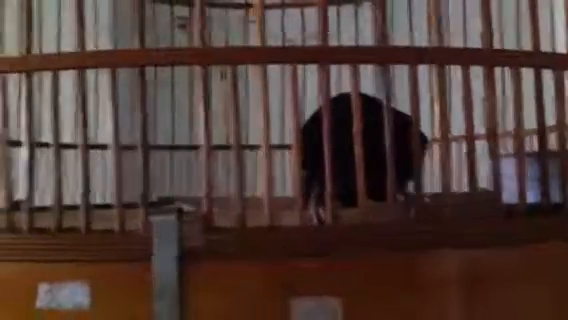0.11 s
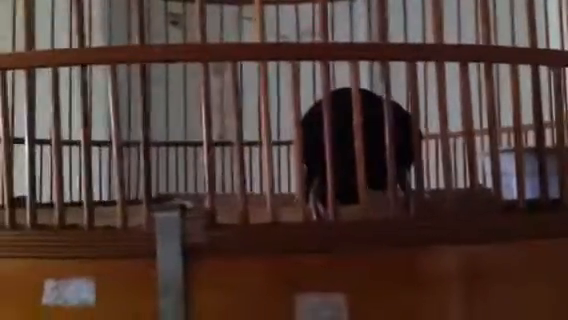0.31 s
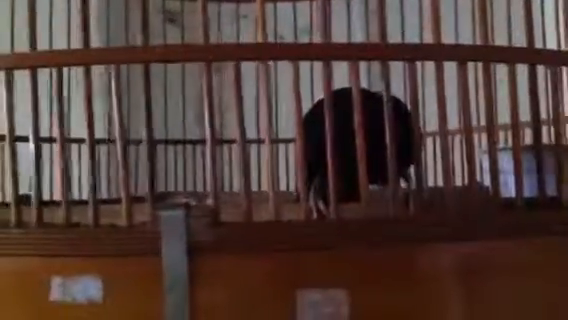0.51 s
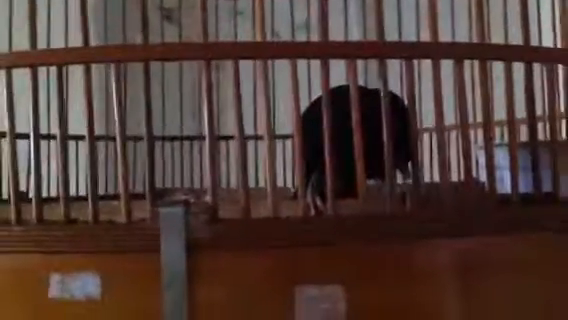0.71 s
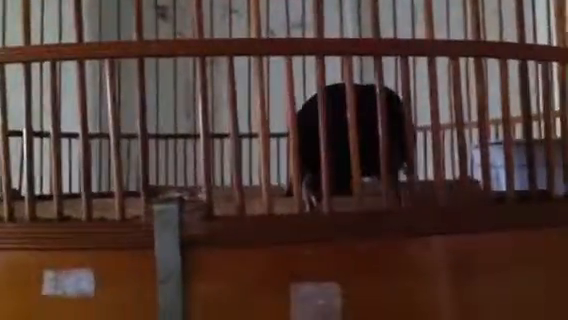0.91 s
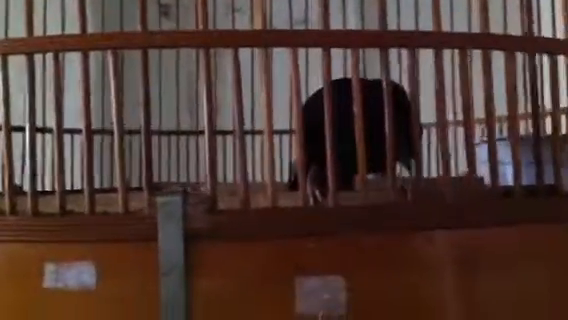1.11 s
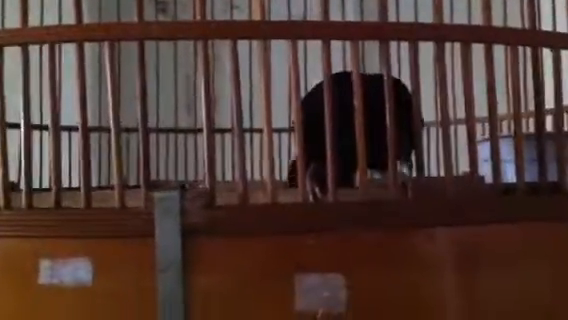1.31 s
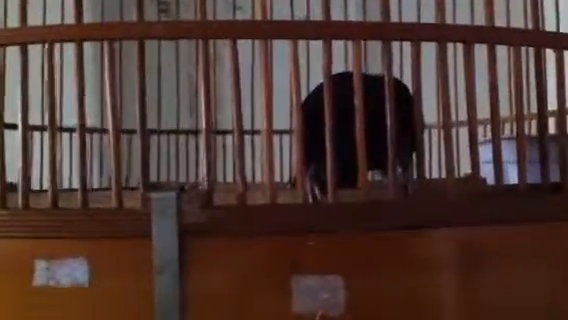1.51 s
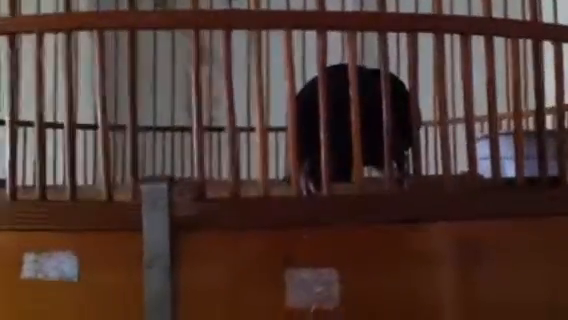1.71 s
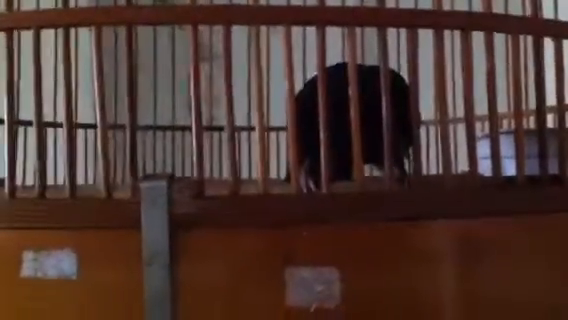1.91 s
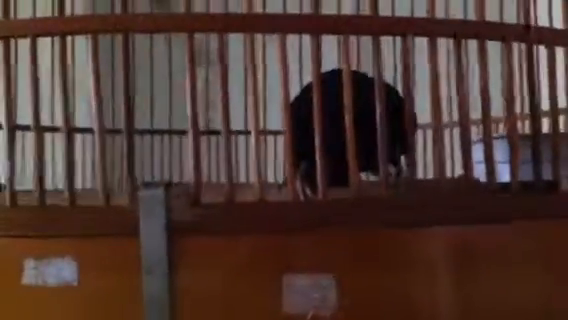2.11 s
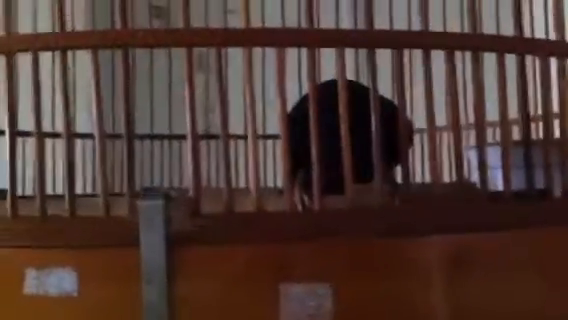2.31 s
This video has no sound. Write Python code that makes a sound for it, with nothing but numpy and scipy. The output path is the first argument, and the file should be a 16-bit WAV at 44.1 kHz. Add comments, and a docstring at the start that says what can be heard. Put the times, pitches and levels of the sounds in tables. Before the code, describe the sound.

A songbird in a cage sings close to a small microphone in a bare, echoing room: an earlier note fades, a low warble follows, then loud whistles sweep up and drop down over a faint steady murmur.

```python
"""A songbird sings close to a small microphone in a bare, echoing room, over a steady murmur and faint treble noise.
First an earlier note rings away in the room, while a faint whistle wavers further off; then comes a low warble.
From then on the two sides of the voice box take turns: one starts low and slides up into a loud whistle, the
other cuts in high and falls to a low note. Each whistle is a near sine with weak overtones and airy hiss,
and it buzzes around the hand-overs; filtered noise makes the hiss, the treble noise and the murmur."""
import sys
import numpy as np
from scipy import signal
from scipy.fft import rfft, irfft
from scipy.io import wavfile

SR = 44100
rng = np.random.default_rng(int(sys.argv[2]) if len(sys.argv) > 2 else 0)


def wrap_up_sound(samples):
    """Save the sound to the file named by the first command line argument, as 16-bit audio."""
    columns = np.atleast_2d(samples).T
    # keep every value between -1 and 1, then stretch to whole-number steps
    tamed = np.clip(columns, -1, 1)
    steps = np.round(tamed * 32767).astype(np.int16)
    wavfile.write(sys.argv[1], SR, steps)


def gain_from_decibels(decibels):
    """Convert decibel values to linear amplitude factors."""
    exponent = np.asarray(decibels, float) / 20
    return 10 ** exponent


N = 108045
LEAD = SR // 4   # samples played before time 0, so that the room is already ringing
TIME = np.arange(-LEAD, N) / SR

# overtones of the whistle, before size and colour act on them: (multiple of the pitch, level re whistle [dB])
OVERTONES = [(2, -23.5), (3, -30.5), (4, -43.5), (5, -37), (6, -37.5), (7, -36.5), (8, -42), (9, -56.5),
             (10, -61.5)]


def in_time(rows, column):
    """Linear interpolation: a table column read at every sample."""
    rows = np.array(rows)
    return np.interp(TIME, rows[:, 0], rows[:, column])


def coloured(spectrum):
    """Spectral shaping: white noise weighted by frequency (Hz, relative density in dB), then set to rms 1."""
    hz, db = np.transpose(spectrum)
    f = np.fft.rfftfreq(len(TIME), 1 / SR) + 1   # 1 Hz up, to keep the logarithm finite
    weight = gain_from_decibels(np.interp(np.log(f), np.log(hz), db, left=-90, right=-90))
    white = rng.standard_normal(len(TIME))
    x = irfft(rfft(white) * weight, len(TIME))
    return x / x.std()


def drift(cutoff_hz):
    """Band-limited chance: low-passed white noise, set to standard deviation 1."""
    low_pass = signal.butter(2, cutoff_hz, fs=SR, output="sos")
    x = signal.sosfiltfilt(low_pass, rng.standard_normal(len(TIME)))
    return x / x.std()


def murmur():
    """Stationary noise: a steady background, densest near 1.5 kHz."""
    # background spectrum: (frequency [Hz], relative density [dB])
    murmur_spectrum = [(18, -93), (30, -34), (277, -18.5), (1050, -30), (1410, -27), (1560, 1.5),
                       (1870, -6), (2920, -37), (3700, -43), (15600, -54)]
    return gain_from_decibels(-49) * coloured(murmur_spectrum)   # rms in dB


def treble_noise():
    """Amplitude-modulated noise: faint treble noise, changing in level."""
    # level of the treble noise: (time [s], rms level [dB])
    treble_noise_course = [(0.0, -61), (.09, -70), (.11, -49), (.38, -55), (.6, -58), (1.0, -49.5),
                           (1.6, -66), (1.7, -75), (1.93, -65), (2.2, -52.5), (2.3, -58.5), (2.4, -67.5),
                           (2.42, -52.5), (2.45, -50.5)]
    # spectrum of the treble noise: (frequency [Hz], relative density [dB])
    treble_noise_spectrum = [(2000, -1), (4000, 1), (7000, -1.5), (10500, -24), (12000, -9), (15500, -18)]
    return gain_from_decibels(in_time(treble_noise_course, column=1)) * coloured(treble_noise_spectrum)


def far_whistle():
    """Random amplitude modulation: a thin gliding tone whose strength wavers quickly."""
    # far tone: (time [s], pitch [Hz], level before the wavering [dB])
    far_course = [(0.0, 2195, -42), (.08, 2117, -33), (.14, 2110, -39), (.2, 2163, -30), (.27, 2160, -42),
                  (.33, 2120, -32), (.38, 2140, -40.5), (.5, 2136, -29), (.6, 2040, -57)]
    phase = 2 * np.pi * np.cumsum(in_time(far_course, column=1)) / SR
    fade = np.clip((far_course[-1][0] - TIME) * 20, 0, 1)   # the last 50 ms
    waver = drift(cutoff_hz=23.3)
    return gain_from_decibels(in_time(far_course, column=2)) * fade * waver * np.sin(phase)


def room(x):
    """Reverberation: convolution with decaying noise, its decay time set by frequency, and a wall echo."""
    # reverberation time: (frequency [Hz], time to fall 60 dB [s])
    decay_times = [(700, 0.59), (1500, 0.54), (2500, 0.39), (4000, 0.39), (8000, 0.57), (14000, 0.1)]
    # distinct wall echoes: (delay [s], level re direct sound [dB])
    wall_echoes = [(.05, -17.5)]
    tail_db, start_s, echo_smear_s = -7.5, 0.0013, 0.0038
    t = np.arange(SR) / SR
    hz, t60 = np.transpose(decay_times)
    tail = 0
    band_edges = 300 * 2 ** np.arange(0, 6.1, .5)   # half octaves, Hz
    for low, high in zip(band_edges, band_edges[1:]):
        band_pass = signal.butter(2, [low, high], "band", fs=SR, output="sos")
        band = signal.sosfilt(band_pass, rng.standard_normal(SR))
        band_t60 = np.interp(np.log(low * high) / 2, np.log(hz), t60)
        tail = tail + band * gain_from_decibels(-60 * t / band_t60)
    tail = tail * np.clip(t / start_s - 1, 0, 1)   # silent up to start_s, full at twice that
    tail = gain_from_decibels(tail_db) * tail / np.sqrt(np.sum(tail ** 2))
    for delay, db in wall_echoes:
        burst = rng.standard_normal(SR) * np.exp(-((t - delay) / echo_smear_s) ** 2)
        tail = tail + gain_from_decibels(db) * burst / np.sqrt(np.sum(burst ** 2))
    return signal.fftconvolve(x, tail)[:len(x)]


def buzz():
    """Amplitude and phase modulation: its depth, uneven pulses for the strength, and a shake for the phase."""
    # spells of buzz, around the times when both sides sound: (start [s], end [s], added depth [0-1])
    buzz_spells = [(0.624, 0.626, 0), (0.846, .872, 0.43), (1.081, 1.128, 0.41), (1.331, 1.359, 0.37),
                   (1.586, 1.627, 0.46), (1.772, 1.791, 0.2), (1.94, 2.014, 0.33), (2.102, 2.111, 0.15)]
    grain = 0.063   # depth present in every note
    edge_s = 0.022   # each ramp is centred on the start or end of its spell
    pulse_hz, rate_spread = 210.7, 0.299   # mean rate, and its standard deviation as a fraction
    depth = np.full(len(TIME), grain)
    for start, end, added in buzz_spells:
        depth += added * np.clip(np.minimum(TIME - start, end - TIME) / edge_s + .5, 0, 1)
    rate = pulse_hz * (1 + rate_spread * drift(cutoff_hz=62.2))
    pulses = np.sin(2 * np.pi * np.cumsum(rate) / SR)
    return depth, pulses, drift(cutoff_hz=269.0)


def whistle(notes, flicker, depth, pulses, shake):
    """Harmonic synthesis: a gliding near sine with flickering overtones; also returns the drive of the hiss."""
    # beak and microphone weight the overtones: (frequency [Hz], gain [dB])
    overtone_response = [(1500, 2), (4000, -7), (7500, -5.5), (9000, 4), (12000, 3), (15500, -13.5)]
    edge_s = 0.00355   # fade just outside both ends of a note
    flare_db, flare_octaves_per_s, slide_memory_hz = 21, 46.3, 17.8   # upper overtones after an upward slide
    full_voice = 0.37   # peak amplitude at which overtones 2 and 3 reach their listed level
    rough_db = 1   # overtone gain per unit of buzz depth
    hiss_reference_hz, hiss_pitch_power = 2500, 0.5   # hiss grows with pitch
    tone, drive = np.zeros(len(TIME)), np.zeros(len(TIME))
    memory = np.exp(-2 * np.pi * slide_memory_hz / SR)
    response_hz, response_db = np.transpose(overtone_response)
    for rows in notes:
        edge = np.clip(np.minimum(TIME - rows[0][0], rows[-1][0] - TIME) / edge_s + 1, 0, 1)
        on = edge > 0
        size = (np.sqrt(2) * edge * gain_from_decibels(in_time(rows, column=2)))[on]   # rms level to peak amplitude
        hz = in_time(rows, column=1)[on]
        slide = np.gradient(np.log2(hz)) * SR   # octaves per second
        recent_slide = signal.lfilter([1 - memory], [1, -memory], slide)
        flare = np.clip(recent_slide / flare_octaves_per_s, 0, 1)
        phase = 2 * np.pi * np.cumsum(hz) / SR + (depth * shake)[on]
        overtones = 0
        for (k, db), unsteady in zip(OVERTONES, flicker):
            level_db = db + np.interp(k * hz, response_hz, response_db) + rough_db * depth[on]
            if k >= 4:
                strength = gain_from_decibels(level_db + flare_db * flare)
            else:
                strength = gain_from_decibels(level_db) * size / full_voice
            audible = k * hz < SR / 2   # nothing above half the sample rate
            overtones = overtones + strength * unsteady[on] * np.sin(k * phase) * audible
        tone[on] += size * (1 + depth * pulses)[on] * (np.sin(phase) + overtones)
        drive[on] += size * (hz / hiss_reference_hz) ** hiss_pitch_power
    return tone, drive


def bird():
    """Two sources in one voice: both sides of the voice box, with turbulent hiss riding on their amplitude."""
    # notes, one table each: (time [s], pitch [Hz], rms level of the sine before buzz [dB])
    earlier_note = [
        [(-.2, 1910, -13), (-.17, 1643, -27.5), (-.14, 1393, -23.5), (-.12, 1490, -66)],
    ]   # end of the phrase before
    warble_notes = [
        [(.155, 720, -47.5), (.175, 913, -25.5), (.195, 946, -20.5), (.205, 930, -42)],
        [(.212, 1015, -27), (.225, 1179, -22.5), (.245, 1236, -17), (.258, 1065, -52)],
        [(.268, 730, -39.5), (.283, 958, -14.5), (.3, 1080, -33), (.312, 833, -44)],
        [(.342, 950, -43), (.35, 923, -15), (.358, 884, -18.5), (.366, 877, -18), (.372, 860, -45)],
        [(.45, 800, -47), (.47, 771, -29), (.495, 842, -31.5), (.505, 706, -41)],
    ]   # low opening
    rising_side = [
        [(.393, 1650, -28), (.402, 1960, -11), (.411, 2220, -11), (.42, 2579, -20.5), (.427, 2550, -18)],
        [(.553, 800, -28), (.57, 829, -29.5), (.588, 844, -23)],
        [(.595, 2226, -38), (.601, 2558, -16), (.606, 2227, -9), (.62, 2467, -10.5), (.634, 2844, -10),
         (.642, 2625, -14), (.652, 1807, -29.5), (.662, 975, -32.5), (.675, 883, -17), (.69, 860, -35.5)],
        [(.758, 774.5, -42.5), (.775, 868, -28.5), (.79, 878, -21.5), (.8, 1521, -43.5), (.806, 2160, -34),
         (.812, 2455, -13), (.816, 2294, -11), (.822, 2286, -18), (.83, 2454, -8.5), (.845, 2649, -9.5),
         (.862, 2620, -15.5), (.87, 2600, -41)],
        [(.998, 813, -34), (1.01, 901.4, -29), (1.022, 850, -26), (1.032, 1612, -48), (1.037, 2117, -30.5),
         (1.042, 2480, -13.5), (1.047, 2326, -25), (1.053, 2357, -12.5), (1.062, 2459, -12.5), (1.08, 2605, -8),
         (1.1, 2653, -7.5), (1.115, 2550, -34)],
        [(1.262, 806.5, -31), (1.272, 888, -31), (1.285, 857.5, -27.5), (1.294, 1582, -42.5),
         (1.302, 2202, -29), (1.31, 2313, -12.5), (1.33, 2449, -11), (1.342, 2585, -12.5), (1.354, 2895, -10),
         (1.362, 2776, -14.5)],
        [(1.495, 770, -37.5), (1.508, 971, -26), (1.518, 1000, -27), (1.527, 1740, -45), (1.534, 2121, -16),
         (1.55, 2357, -12), (1.57, 2523, -9.5), (1.58, 2672, -10.5), (1.586, 2584, -9)],
        [(1.716, 1464, -26), (1.721, 1720, -18.5), (1.728, 1555, -26.5), (1.736, 1360, -17.5),
         (1.742, 1520, -22)],
        [(1.742, 1925, -29), (1.748, 2120, -25.5), (1.758, 2370, -21), (1.77, 2335, -18), (1.778, 2130, -31)],
        [(1.943, 1740, -27), (1.949, 1970, -10.5), (1.957, 1963, -20), (1.962, 2084, -9.5), (1.967, 2304, -14),
         (1.974, 2436, -11.5), (1.98, 2560, -36), (1.986, 2360, -17)],
        [(2.058, 1707, -17.5), (2.066, 2027, -14), (2.078, 2285, -16.5), (2.09, 2057, -24), (2.105, 2072, -17)],
    ]
    falling_side = [
        [(.848, 3290, -27.5), (.856, 3493, -25), (.866, 2788, -9.5), (.876, 1803, -30.5), (.888, 941, -30.5),
         (.9, 870, -21.5), (.91, 887, -35)],
        [(1.1, 3417, -18.5), (1.11, 3508, -27), (1.122, 2917, -7), (1.132, 2197, -49), (1.143, 1253, -35),
         (1.152, 923, -26), (1.165, 836, -27)],
        [(1.34, 2954, -9.5), (1.35, 3298, -21.5), (1.36, 2906, -27), (1.37, 2387, -26.5), (1.38, 1361, -34.5),
         (1.39, 916, -24), (1.408, 938, -27.5), (1.42, 892, -30.5)],
        [(1.576, 3000, -16.5), (1.592, 3240, -16.5), (1.602, 2862, -9), (1.612, 2096, -24), (1.628, 1721, -23),
         (1.64, 1399, -19), (1.652, 1402, -23)],
        [(1.774, 3300, -33), (1.782, 3090, -30.5), (1.79, 2725, -15), (1.802, 2480, -29), (1.808, 2560, -27)],
        [(1.813, 1843, -25), (1.82, 1850, -20.5), (1.832, 1547, -17), (1.845, 1518, -17.5)],
        [(1.994, 2993, -37), (1.999, 2998, -22), (2.008, 3174, -15), (2.022, 2606, -15.5), (2.036, 2270, -23)],
        [(2.036, 1745, -29), (2.042, 1649, -15), (2.058, 1722, -13.5), (2.068, 1820, -53)],
        [(2.106, 3300, -37.5), (2.114, 2880, -15.5), (2.128, 2490, -19), (2.14, 2150, -24.5)],
        [(2.142, 1743, -30), (2.148, 1741, -12.5), (2.16, 1487, -21), (2.17, 1645, -14.5), (2.176, 1610, -50)],
    ]
    # airiness: (time [s], hiss rms re whistle peak amplitude at 2500 Hz [dB])
    airiness = [(0.0, -34), (.38, -39), (.42, -36), (.9, -28), (1.3, -32), (1.6, -29), (1.72, -17.5),
                (1.9, -26.5), (2.2, -24), (2.45, -28)]
    # spectrum of the hiss: (frequency [Hz], relative density [dB])
    hiss_spectrum = [(3000, 6), (4000, -16.5), (6000, -32.5), (8000, -23), (9000, -3), (11000, -11),
                     (13000, -4.5), (15000, -5), (16000, -8)]
    flicker_db = 4   # standard deviation
    flicker = [gain_from_decibels(flicker_db * drift(cutoff_hz=210.0)) for _ in OVERTONES]
    depth, pulses, shake = buzz()
    notes = earlier_note + warble_notes + rising_side + falling_side
    tone, drive = whistle(notes, flicker, depth, pulses, shake)
    hiss = drive * gain_from_decibels(in_time(airiness, column=1)) * coloured(hiss_spectrum)
    return tone + hiss


def scene():
    """Superposition: direct song, its reverberation, far whistle, treble noise and murmur, from time 0 on."""
    song = bird()
    mix = song + room(song) + far_whistle() + treble_noise() + murmur()
    return mix[None, LEAD:]


def microphone(dry):
    """Nonlinear distortion: peaks are rounded, and a weak squared term adds even-order products."""
    high_pass = signal.butter(4, 1400, "high", fs=SR, output="sos")
    even_order = gain_from_decibels(-29) * signal.sosfilt(high_pass, dry ** 2)
    return np.tanh(dry) + even_order


def band_limit(x):
    """A steep low-pass at the top of the band."""
    return signal.sosfilt(signal.butter(12, 15760, fs=SR, output="sos"), x)


def record(dry):
    """Band limiting: the microphone signal passes a steep low-pass filter."""
    low_pass = signal.cheby2(18, 60, 15950, fs=SR, output="sos")   # 60 dB down from 15950 Hz
    finished = signal.sosfilt(low_pass, microphone(dry))
    return band_limit(finished)


dry = scene()
out = record(dry)
wrap_up_sound(out)
```